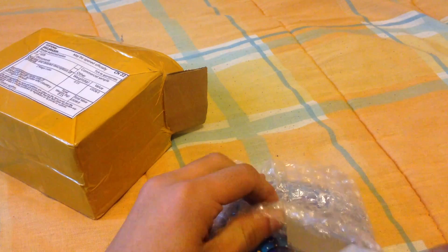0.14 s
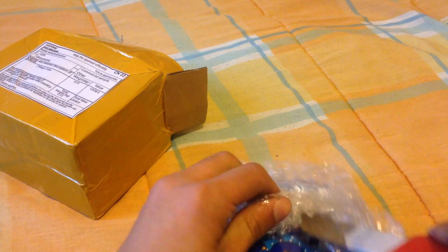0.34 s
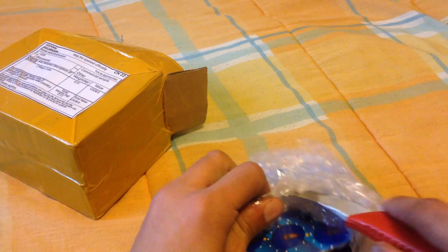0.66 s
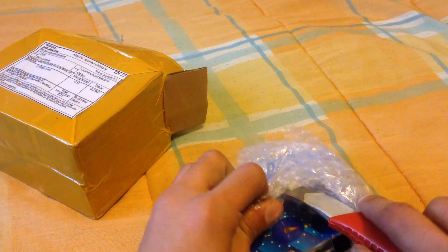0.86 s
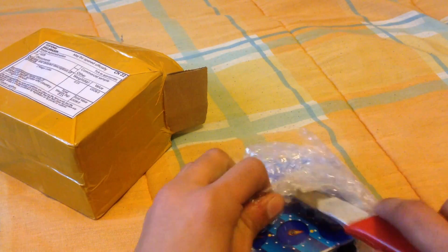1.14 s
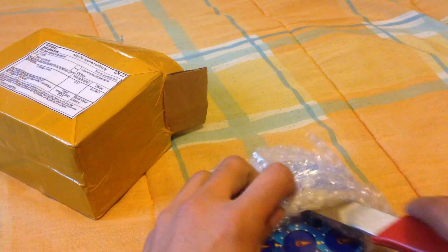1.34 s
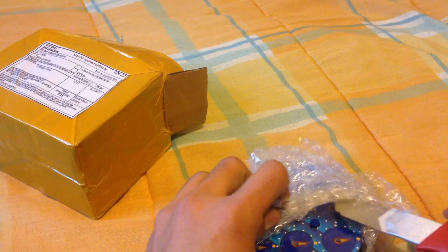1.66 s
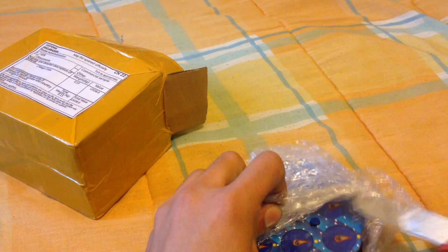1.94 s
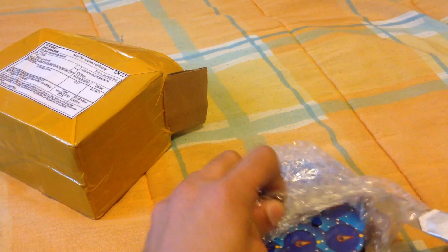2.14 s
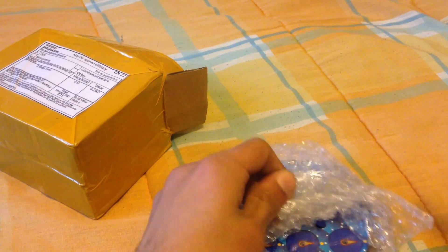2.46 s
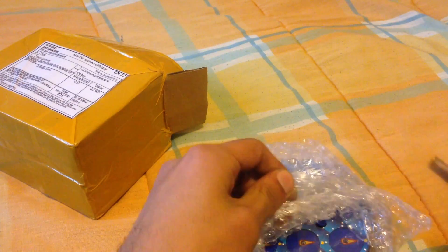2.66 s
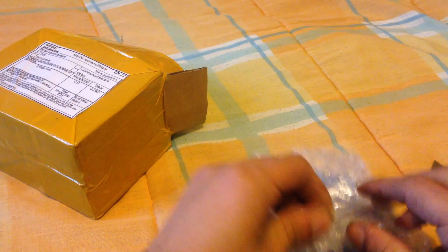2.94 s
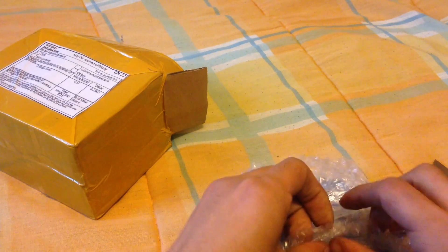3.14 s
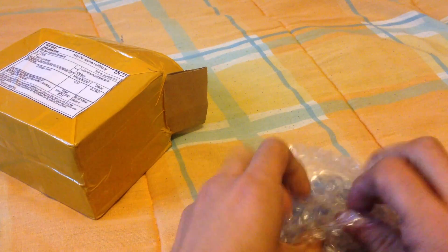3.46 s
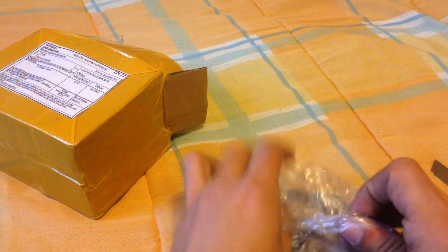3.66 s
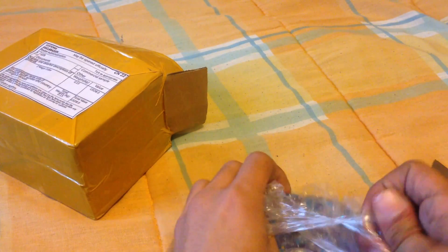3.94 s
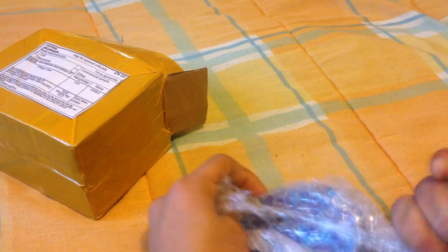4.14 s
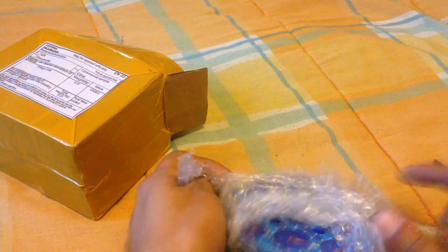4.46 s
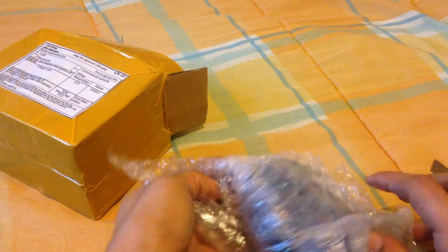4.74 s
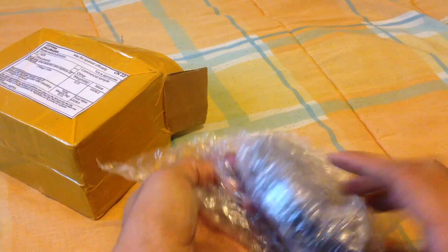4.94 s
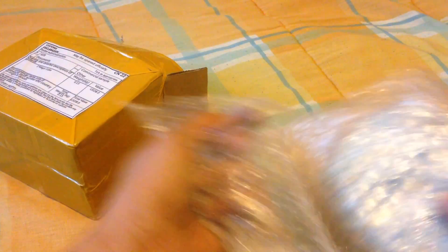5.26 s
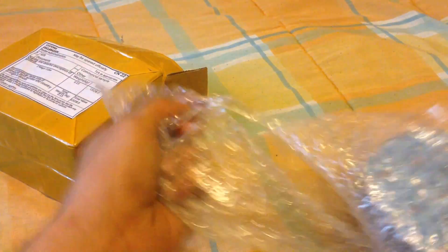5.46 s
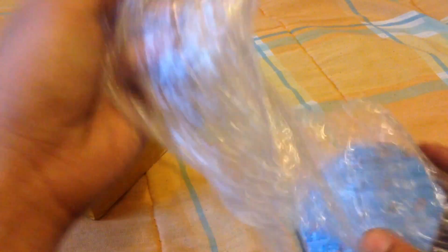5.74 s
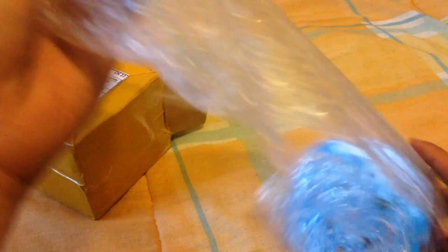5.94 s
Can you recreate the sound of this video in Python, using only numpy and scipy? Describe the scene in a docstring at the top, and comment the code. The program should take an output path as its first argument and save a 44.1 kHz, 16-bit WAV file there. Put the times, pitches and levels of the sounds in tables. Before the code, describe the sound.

Bubble wrap crinkles and crackles unevenly close by, with sharp snaps, short film rasps and small knocks, growing much busier as it is pulled away.

```python
"""Unwrapping bubble wrap

Hands cut a sheet of bubble wrap with a knife and pull it off a small hard object on a bed, close by.
The film crinkles throughout as random clumps of tiny resonant buckles; creases snap as damped pulses.
Film and tape rasp and squeak by stick-slip friction, and the object takes knocks that excite its modes.
A small room adds a soft diffuse tail over room air, a low wavering hum, bedding noise and a faint drone."""
import sys
import numpy as np
from scipy import signal
from scipy.fft import rfft, irfft
from scipy.io import wavfile
from scipy.ndimage import uniform_filter1d

SR = 44100
rng = np.random.default_rng(int(sys.argv[2]) if len(sys.argv) > 2 else 0)


def unload_audio(sound):
    """Save the sound as a 16-bit wav file, at the path given as the first command line argument."""
    columns = np.transpose(np.atleast_2d(sound))
    # keep every value between -1 and 1, then stretch to whole-number steps
    steps = np.round(np.clip(columns, -1, 1) * 32767)
    wavfile.write(sys.argv[1], SR, steps.astype(np.int16))


N = 268872  # length [samples]

# colour of the film: (frequency [Hz], relative gain [dB])
FILM_COLOUR = [(100, -14), (250, -2.5), (450, -1.5), (750, -2), (1150, 0.5), (2000, -0.5), (2700, -1),
               (3700, 2.5), (5500, 1.5), (7500, 2), (9500, 4.5), (12500, 8), (15000, 4.5)]
LOW_EDGE_HZ, HIGH_EDGE_HZ = 2000, 7000  # borders of the three bands
CUTOFF_HZ = 15500  # upper limit of the snaps and of the output


def amp(db):
    """Amplitude ratio: twenty decibels are a factor of ten."""
    return 10 ** (np.asarray(db) / 20)


def unit(x):
    """Power normalisation: scales to an rms of one."""
    return x / np.sqrt(np.mean(x ** 2) + 1e-20)


def one_ms(x):
    """Energy normalisation: scales to the energy of one millisecond at an rms of one."""
    return x * np.sqrt(SR / 1000 / (np.sum(x ** 2) + 1e-20))


def read(points, hz):
    """Interpolation on a logarithmic frequency axis."""
    f, value = np.transpose(points)
    return np.interp(np.log(hz + 1), np.log(f), value)


def curves(rows):
    """Linear interpolation in time: one value a sample for each column after the first."""
    s, *columns = np.transpose(rows)
    return [np.interp(np.arange(N) / SR, s, c) for c in columns]


def add(mix, s, sound):
    """Superposition: adds a sound to the mix from time s [s]."""
    part = mix[max(round(s * SR), 0):][:len(sound)]
    part += sound[:len(part)]


def colour(x, points):
    """Linear filtering: multiplies the spectrum by a gain curve."""
    gain = amp(read(points, np.fft.rfftfreq(len(x), 1 / SR)))
    return irfft(rfft(x) * gain, len(x))


def ring(x, hz, q):
    """Damped resonance with a peak gain of one; q has a floor that rises with frequency."""
    hz = min(hz, SR * .45)
    b, a = signal.iirpeak(hz, max(q, 3 * hz / SR), fs=SR)
    return signal.lfilter(b, a, x)


def resonate(x, hz, width):
    """Heterodyne resonance: a low-pass in a frame turning at hz, so the peak follows that curve."""
    turn = np.exp(2j * np.pi * np.cumsum(hz) / SR)
    r = np.exp(-np.pi * width / SR)
    return 2 * (turn * signal.lfilter([1 - r], [1, -r], x / turn)).real


def bands(x):
    """Complementary filtering into low (whole sheet), mid (bubbles) and high (sharp creases)."""
    hz = np.fft.rfftfreq(len(x), 1 / SR)
    below_low, below_high = [1 / (1 + (hz / edge) ** 8) for edge in (LOW_EDGE_HZ, HIGH_EDGE_HZ)]
    shares = (below_low, below_high - below_low, 1 - below_high)
    return [irfft(rfft(x) * share, len(x)) for share in shares]


def grains(per_s, spread_db, q, count=40):
    """Random impulse excitation: tiny buckles, mostly small, each ringing its own patch of film."""
    size = amp(spread_db * np.minimum(rng.exponential(1, N), 3.5)) * rng.choice([-1, 1], N)
    size *= rng.random(N) < per_s / SR
    patch = rng.integers(0, count, N)
    patch_hz = np.linspace(1000, 14500, count)
    rings = sum(ring(size * (patch == k), hz, q) / np.sqrt(hz) for k, hz in enumerate(patch_hz))
    return unit(unit(rings) + 1.47 * unit(size))


def film(buckles, haze):
    """Filtered impulses over sliding noise: the film's colour, divided by its own running rms."""
    x = colour(buckles + haze * rng.standard_normal(N), FILM_COLOUR)
    return x / np.sqrt(abs(uniform_filter1d(x ** 2, size=1500)) + 1e-9)


def stroke(t, length):
    """Friction envelope: a slip starts at once, slackens, and dies quickly at its end."""
    onset = np.minimum(t / 0.00092, 1)
    release = np.exp(-np.maximum(t - length, 0) / 0.0036)
    return onset * release * amp(3.2 * (.5 - t / length))


def swell(start, length):
    """Smooth motion from rest to rest: a power of half a sine."""
    phase = np.clip((np.arange(N) / SR - start) / length, 0, 1)
    return abs(np.sin(np.pi * phase)) ** 0.43


def background():
    """Stationary noise and a frequency-modulated hum: room air, and hands pressing on the bedding."""
    # still room: (frequency [Hz], relative gain [dB])
    floor = [(20, -15), (40, 6), (60, 2), (100, 2), (150, -20), (300, -4.5), (700, -9.5), (2000, -5),
             (15000, -17)]
    # hands press on the bedding: (start [s], length [s], peak level before the bedding's trim [dB])
    presses = [(2.285, 0.18, -54), (3.835, 0.032, -51.5), (5.3, 0.16, -58)]
    bedding_colour = [(40, -22), (85, 5.0), (120, -0.5), (200, -3.0), (300, -14.0), (700, -28)]
    air, waver, stir = rng.standard_normal((3, N))
    # the hum swells once by 10 dB, at 1.95 s, and recedes
    hum_db = -69 + 10 * np.exp(-((np.arange(N) / SR - 1.95) / 0.7) ** 2)
    hum_hz = 57 + 2.66 * unit(uniform_filter1d(waver, size=4000))
    hum = unit(np.sin(2 * np.pi * np.cumsum(hum_hz) / SR)) * amp(hum_db)
    # a steady dull stir lies under the presses
    press = amp(-58) + sum(amp(db) * swell(start, length) for start, length, db in presses)
    bedding = unit(colour(stir, bedding_colour)) * press * amp(-2.5)  # trim
    return amp(-61.0) * unit(colour(air, floor)) + hum + bedding


def drone():
    """Narrow-band noise: two soft, fuzzy tones from twice-resonated noise, with a changing level."""
    # swell of the drone: (time [s], level [dB])
    drone_level = [(0, -80), (2.3, -70.5), (3.0, -64.5), (4.5, -66), (6.1, -56)]
    # its tones: (frequency [Hz], width of each resonance [Hz], relative level [dB])
    drone_tones = [(212.7, 24, -4), (443, 84, 2.6)]
    total = np.zeros(N)
    for hz, width, db in drone_tones:
        once = ring(rng.standard_normal(N), hz, hz / width)
        total += amp(db) * unit(ring(once, hz, hz / width))
    return unit(total) * amp(curves(drone_level)[0])


def handling():
    """Power addition: hand moves add to the sheet at rest, giving low, mid and high rustle gains."""
    # looseness of the sheet, fuller as the body rises:
    # (time [s], mid gain between moves [dB], low gain relative to mid [dB])
    looseness = [(0, -51.5, -17), (1.05, -61, -12), (1.6, -54, -12.5), (2.0, -60.5, -16),
                 (2.6, -56.5, -11.5), (2.9, -58, -3.5), (3.15, -52, -15.5), (3.7, -48, -7.5),
                 (4.15, -50.5, -16.5), (4.8, -52, -9), (5.25, -51, -5.5), (5.5, -48.5, -8),
                 (6.1, -55.5, -6.5)]
    # a hand shifts its grip or draws the sheet along:
    # (start [s], length [s], peak mid gain [dB], high gain relative to mid [dB])
    hand_moves = [(0.247, 0.35, -47, 2), (0.603, .15, -52.5, 5), (0.75, 0.24, -54.5, 0.5),
                  (1.116, 0.049, -46.5, -3.5), (1.135, 0.23, -52, 1.5), (1.333, 0.27, -49.5, 5),
                  (1.428, 0.08, -50, 7), (1.85, 0.07, -52, 1), (2.118, 0.088, -48.5, 4),
                  (2.235, 0.27, -48, 3), (2.67, 0.23, -57, -3), (2.896, 0.19, -48, 1.5),
                  (3.101, .08, -52.5, 9), (3.288, 0.096, -45.5, 3.5), (3.403, 0.17, -44.5, 3),
                  (3.548, .11, -40, 2), (3.633, 0.28, -43.5, 0.5), (3.92, 0.17, -46, 3),
                  (4.344, 0.19, -37, 2), (4.466, 0.19, -43.5, 1), (4.65, .19, -43.5, 3),
                  (4.939, 0.13, -49.5, 5.5), (5.038, 0.32, -40, 3.5), (5.369, 0.097, -43, 5),
                  (5.513, 0.55, -46, 4), (5.903, 0.45, -50, 4.5)]
    rest_db, body_db = curves(looseness)
    mid_power, high_power = amp(rest_db) ** 2, amp(rest_db + 1.0) ** 2
    for start, length, db, bright_db in hand_moves:
        power = (amp(db) * swell(start, length)) ** 2
        mid_power = mid_power + power
        high_power = high_power + power * amp(bright_db) ** 2
    mid = np.sqrt(mid_power)
    return mid * amp(body_db), mid, np.sqrt(high_power)


def crinkle(gains):
    """Clustered impulsive noise: the sheet buckles in little clumps as the hands move it."""
    clumps = unit(uniform_filter1d(uniform_filter1d(rng.standard_normal(N), size=350), size=150))
    buckles = grains(per_s=1500, spread_db=0.5, q=2.2)
    texture = film(buckles, haze=.38) * amp(1.4 * clumps)
    trims_db = (-.5, -.6, -.6)
    parts = zip(bands(texture), gains, trims_db)
    return sum(unit(band) * gain * amp(trim) for band, gain, trim in parts)


def ticks(gain):
    """Compressive scaling: faster handling enlarges small creases a little, so lulls expose them."""
    size = amp(-51) * (gain / amp(-45)) ** .65
    return grains(per_s=110, spread_db=3.2, q=2.2) * size


def room(x):
    """Diffuse reverberation: convolution with noise whose decay time depends on frequency."""
    # room decay: (frequency [Hz], time to fall 60 dB [s])
    decay = [(200, 0.2), (1000, 0.15), (3500, 0.14), (8000, 0.17), (15000, 0.2)]
    hz, t, z = signal.stft(rng.standard_normal(SR // 2), SR, nperseg=256)
    fade = amp(-60 * t / read(decay, hz)[:, None])
    tail = signal.istft(z * fade, SR, nperseg=256)[1]
    tail *= np.minimum(np.arange(len(tail)) / SR / 0.0015, 1)  # soft onset
    return signal.fftconvolve(x, tail / np.linalg.norm(tail))[:N]


def squeaks():
    """Stick-slip excitation: uneven catches drive one resonance gliding with the film's tension."""
    # a stretched patch squeaks or groans:
    # (time [s], length [s], level before the envelope [dB], first pitch [Hz], last pitch [Hz])
    glides = [(0.017, 0.0093, -34, 2720, 2570), (0.222, 0.034, -35, 3180, 3200),
              (0.528, 0.025, -46, 2760, 2530), (2.338, 0.015, -34, 2560, 3660),
              (2.441, 0.048, -49.5, 3320, 2520), (2.66, 0.075, -54, 3300, 3280),
              (2.759, 0.0091, -39, 3100, 3100), (2.763, .074, -56, 1250, 1230),
              (2.812, 0.023, -44.5, 3160, 2970), (4.185, 0.032, -34.5, 3470, 3180),
              (4.219, .035, -45, 1290, 885), (4.261, 0.019, -44, 1080, 760), (5.131, 0.069, -47, 610, 990),
              (5.299, 0.027, -43.5, 1080, 890), (5.361, 0.013, -41, 990, 1000),
              (5.655, 0.011, -45, 1220, 1040)]
    out = np.zeros(N)
    for s, length, db, first_hz, last_hz in glides:
        t = np.arange(int((length + 0.032) * SR)) / SR
        hz = np.interp(t, [0, length], [first_hz, last_hz])
        base_width = 120 + first_hz / 12
        # about 700 strong catches a second over faint noise
        catches = rng.standard_normal(len(t)) * (0.06 + (rng.random(len(t)) < 700 / SR))
        tone = resonate(resonate(catches, hz, base_width * 1.9), hz, base_width * 2.0)
        add(out, s, amp(db) * unit(tone) * stroke(t, length))
    return out


def rasps():
    """Stick-slip friction: film or tape slips in a quick run of dense catches."""
    # slips: (time [s], length [s], mid level before envelope and trim [dB],
    # low level relative to mid [dB], high level relative to mid [dB])
    slips = [(0.018, 0.0067, -32.5, -17.5, -1.5), (0.205, 0.0095, -40, -9, 5), (0.216, 0.037, -35, -14, 3),
             (1.602, 0.051, -38.5, -13.5, 1), (1.772, 0.039, -40.5, -22, -3), (2.027, 0.049, -42.5, -13, 0),
             (2.289, 0.039, -38, -8.5, 1), (2.335, 0.026, -35.5, -13, 0), (2.365, 0.043, -46.5, -2.5, 3),
             (2.659, 0.011, -43.5, -5, -10), (2.679, 0.018, -40.5, -5, -4.5),
             (2.755, 0.01, -44.5, -5.5, -10), (2.795, 0.055, -47, -14.5, -1), (3.824, 0.041, -40, -7, 4.5),
             (4.034, 0.026, -34, -13, 4), (4.15, 0.03, -38.5, -18, 9.5), (4.18, 0.025, -31.5, -13.5, 2),
             (4.206, .022, -31.5, -9, -0.5), (4.38, 0.089, -37, -21.5, 0), (5.112, 0.068, -36, -10.5, -2),
             (5.297, 0.04, -43, -4.5, 4.5)]
    out = np.zeros(N)
    catches = film(grains(per_s=1700, spread_db=4, q=5.2), haze=0.93)
    for s, length, slip_db, body_db, bright_db in slips:
        levels_db = slip_db + body_db, slip_db, slip_db + bright_db
        t = np.arange(int((length + 0.0058) * SR)) / SR
        slip = np.take(catches, round(s * SR) + np.arange(len(t)), mode="wrap")
        balanced = sum(amp(db) * unit(b) for b, db in zip(bands(slip), levels_db))
        add(out, s, stroke(t, length) * balanced)
    return out * amp(-0.5)  # trim


def knocks():
    """Modal excitation: a blow crunches the film briefly and the object's modes ring under it."""
    # blade or fingers jolt the wrapped object: (time [s], mid level over one millisecond before trim [dB],
    # low level relative to mid [dB], high level relative to mid [dB])
    blows = [(0.219, -29, 4, 4), (0.399, -35.5, -3, 4), (0.4815, -36, -7, -8), (0.5125, -10.5, -15, -10),
             (0.9175, -30, -12, -6), (0.929, -37, -3.5, 0), (1.567, -27.5, -6.5, 2), (1.6033, -16, -2.5, 1),
             (1.848, -22, -22, 2), (2.029, -20.5, -7, 1), (2.3005, -20.5, -12, 3.5), (2.692, -35, -3, -1),
             (4.988, -37.5, 4.5, 0), (5.119, -20, -8, 6), (5.379, -30.5, -16, -11), (5.659, -48.5, 11, -1)]
    # modes of the object: (frequency [Hz], relative level [dB], time to fall 60 dB [s])
    object_modes = [(396, -16.5, 0.027), (615, -7.5, 0.015), (912, -6.5, 0.0093), (1250, -16, 0.019),
                    (1610, -0.5, 0.011), (2270, 3, .019), (2795, -2.5, 0.027), (3410, 11, 0.0077),
                    (3860, 9.5, 0.0072), (4520, 4.5, 0.0089), (6220, 11.5, 0.0046)]
    out, t = np.zeros(N), np.arange(4096) / SR
    for s, blow_db, thud_db, bright_db in blows:
        levels_db = blow_db + thud_db, blow_db, blow_db + bright_db
        crunch = colour(rng.standard_normal(len(t)), FILM_COLOUR) * np.exp(-t / 0.0041)
        modes = np.zeros(len(t))
        for hz, db, t60 in object_modes:
            detuned_hz = hz * rng.normal(1, 0.0066)
            sine = np.sin(2 * np.pi * detuned_hz * t) * rng.choice([-1, 1])
            modes += amp(db - 60 * t / t60) * sine
        blow = (unit(modes) + 1.4 * unit(crunch)) * np.minimum(t / 0.00042, 1)
        parts = bands(np.pad(blow, 64))  # padding leaves room for the filters to spread
        add(out, s - 64 / SR, sum(amp(db) * one_ms(b) for b, db in zip(parts, levels_db)))
    return out * amp(-2.0)  # trim


def snaps():
    """Snap-through: a crease flips in a few cycles, a nearby surface reflects it, the sheet shivers."""
    # a crease or bubble snaps over; slack film ticks, taut film rings:
    # (time [s], level over one millisecond before trim [dB], ring [Hz], least quality factor [1])
    creases = [(0.2201, -23, 3400, 0.28), (0.776, -26.5, 2330, 0.22), (0.814, -35, 8100, .6),
               (0.8766, -36, 4400, 0.87), (0.893, -34, 4000, 1.4), (1.0383, -27, 3650, 1.1),
               (1.0705, -25, 4840, 0.38), (1.2015, -18.5, 12200, 2.2), (1.2405, -29.5, 3130, 3.3),
               (1.255, -26.5, 4640, 0.46), (1.475, -21.5, 12900, 4.4), (1.493, -23, 13400, 5),
               (1.639, -13.5, 7900, 1), (1.6708, -25.5, 5550, .9), (1.731, -21.5, 4070, 1.5),
               (1.7657, -14, 6040, 1.3), (1.7752, -15.5, 6900, 1.9), (1.7871, -30, 6100, 2.2),
               (1.8354, -27, 3860, 0.83), (1.8533, -28, 3380, 1.3), (1.8971, -32, 7700, 0.44),
               (1.9163, -28.5, 11200, 6), (1.9326, -33, 4730, 2), (1.9519, -30, 11900, 1.6),
               (1.9583, -29, 8800, 1.8), (2.0025, -33, 4000, .8), (2.065, -23.5, 5700, 7.2),
               (2.137, -32, 3850, 3.5), (2.3157, -20.5, 4930, 1), (2.379, -23.5, 5450, 7),
               (2.4349, -22, 9100, .5), (2.621, -29, 10600, 1.7), (3.0209, -12.5, 12400, 6.2),
               (3.1687, -29, 10000, 0.95), (3.29, -29, 9600, 1.1), (3.351, -27, 14000, 1.6),
               (3.5481, -21.5, 10800, 2.9), (3.6102, -22.5, 6900, 4), (3.803, -28, 1250, 3),
               (3.831, -21.5, 4530, 5), (4.0111, -11.5, 10600, 6), (4.0263, -20, 7450, 2.2),
               (4.039, -3, 12300, 3.3), (4.0505, -15.5, 14000, .7), (4.0788, -19, 12400, 2.8),
               (4.0877, -24, 9800, 2.6), (4.1534, -17, 11300, 3.5), (4.1928, -13.5, 3740, 2.3),
               (4.3036, -14, 11800, 2.5), (4.32, -22, 4370, 1.8), (4.3584, -9, 10300, 1.8),
               (4.3866, -10.5, 6800, 1.3), (4.4441, -15, 5040, 7), (4.4479, -12, 11700, 3.2),
               (4.4545, -16, 10000, 1.5), (4.4794, -18, 11400, 5.5), (4.4916, -19, 12400, 2.7),
               (4.745, -24, 4900, 5.2), (4.8402, -19.5, 5240, 2.72), (4.9885, -17.5, 8600, 1.3),
               (5.1194, -8.5, 11300, 4.9), (5.1392, -28, 3370, 1), (5.167, -15.5, 11400, .7),
               (5.247, -21, 1390, 1.9), (5.2568, -28, 645, 1.5), (5.2972, -21, 1650, 2.2)]
    out, t = np.zeros(N), np.arange(512) / SR
    low_pass = signal.butter(2, CUTOFF_HZ, fs=SR)
    for s, db, hz, q in creases:
        shiver = rng.standard_normal(len(t)) * np.exp(-t / 0.00091)
        push = (t == 0) + 0.76 * shiver / np.linalg.norm(shiver)
        reflection_delay = rng.uniform(.00015, .0005)
        push[round(reflection_delay * SR)] += .4 * rng.choice([-1, 1])
        flip = ring(push, hz, q)
        # bending waves disperse: an all-pass keeps the colour and adds cycles
        flip = flip - 2 * ring(flip, hz * 0.64, 1.0)
        add(out, s, amp(db) * one_ms(signal.lfilter(*low_pass, flip)))
    return out * amp(-2.6)  # trim


def scene():
    """Superposition of the direct sounds, their reverberation and the background."""
    low, mid, high = handling()
    hits = snaps() + knocks() + ticks(high)
    rustle = crinkle((low, mid, high)) + rasps() + squeaks()
    echo = room(amp(-14.5) * hits + amp(-8.5) * rustle)
    return (hits + rustle + echo + background() + drone())[None]


def record(dry):
    """Soft saturation rounds peaks near full scale; a linear-phase low-pass then limits the band."""
    rounded = dry / (1 + (dry / .92) ** 6) ** (1 / 6)
    low_pass = signal.firwin(401, CUTOFF_HZ, window=("kaiser", 8), fs=SR)
    return signal.oaconvolve(rounded, low_pass[None], "same")


dry = scene()
out = record(dry)
unload_audio(out)
```